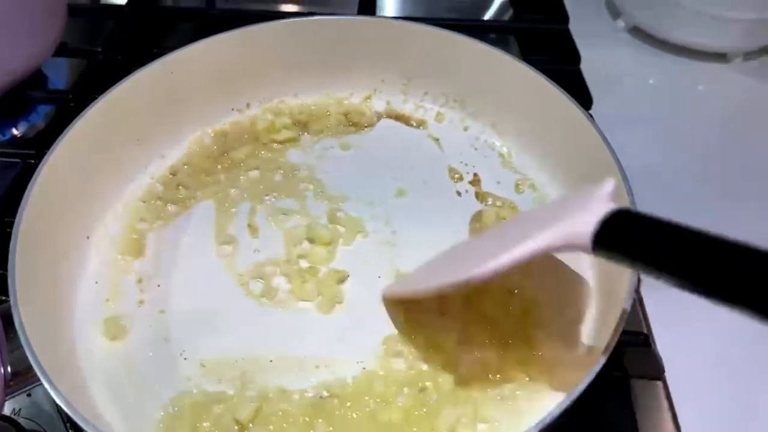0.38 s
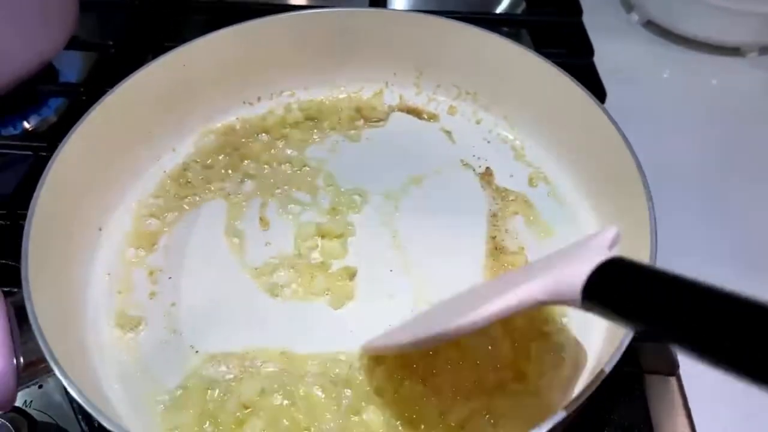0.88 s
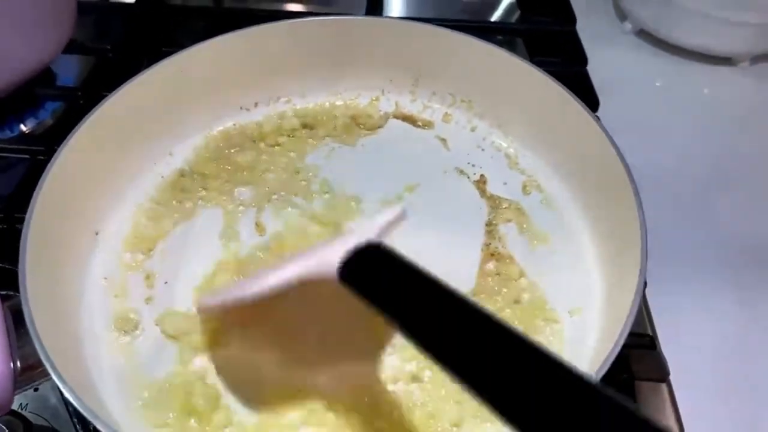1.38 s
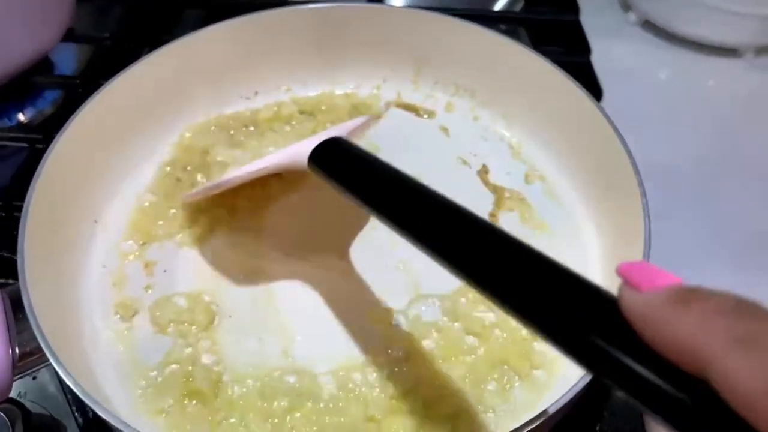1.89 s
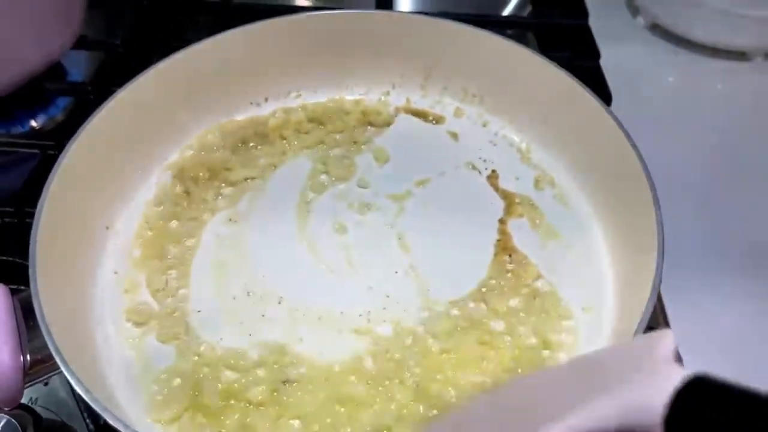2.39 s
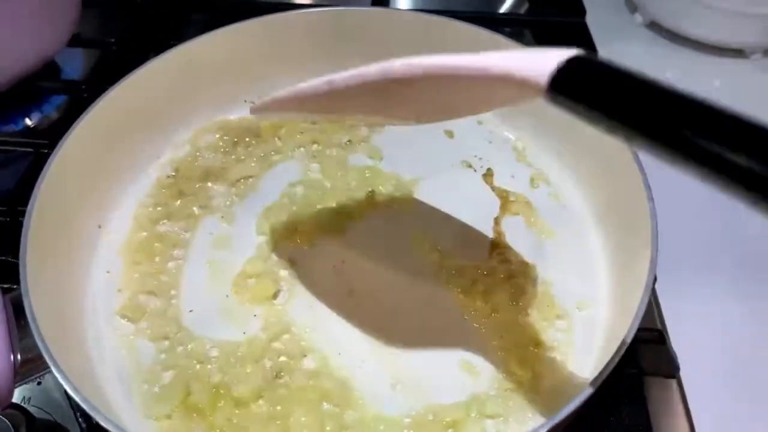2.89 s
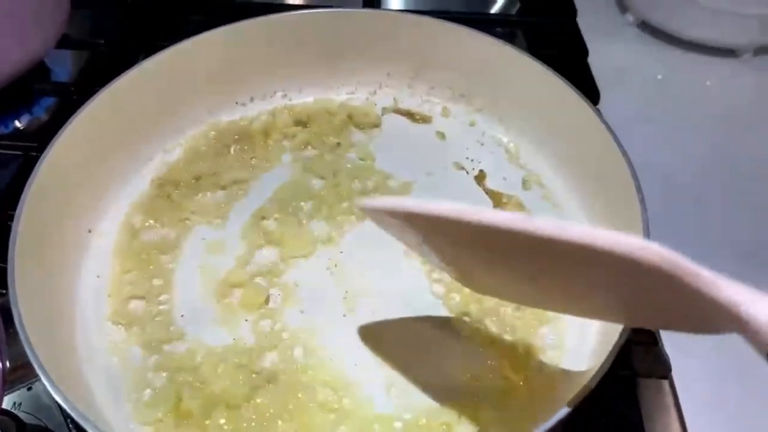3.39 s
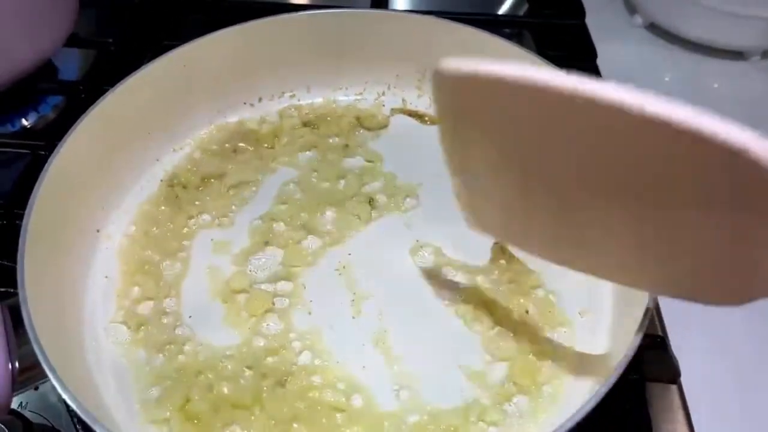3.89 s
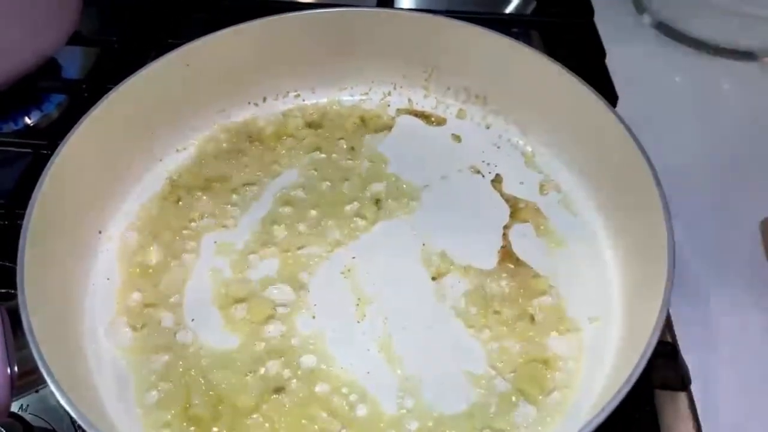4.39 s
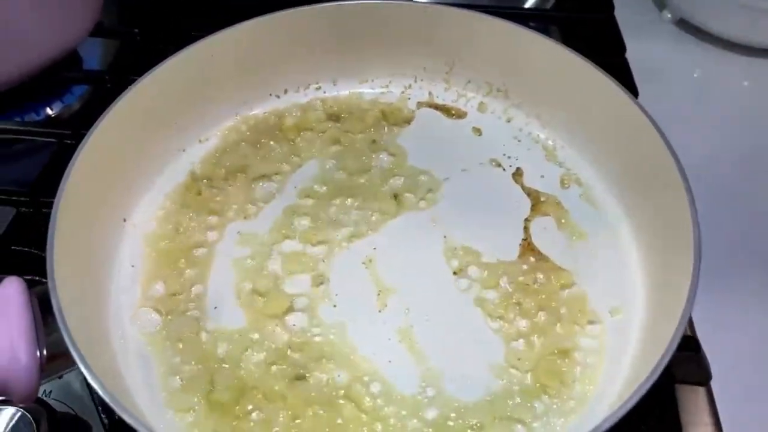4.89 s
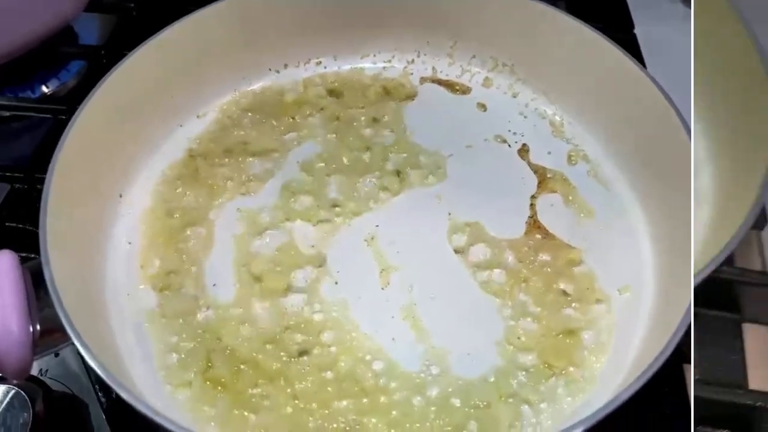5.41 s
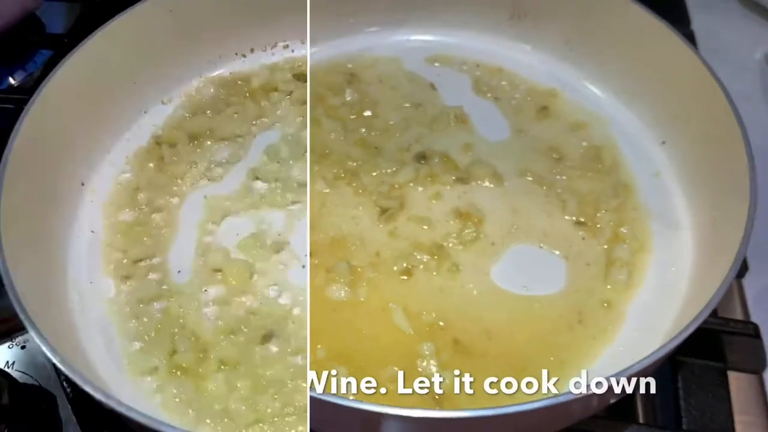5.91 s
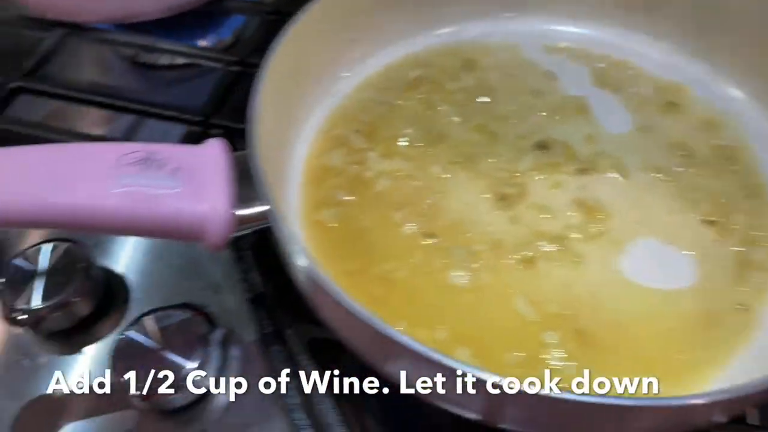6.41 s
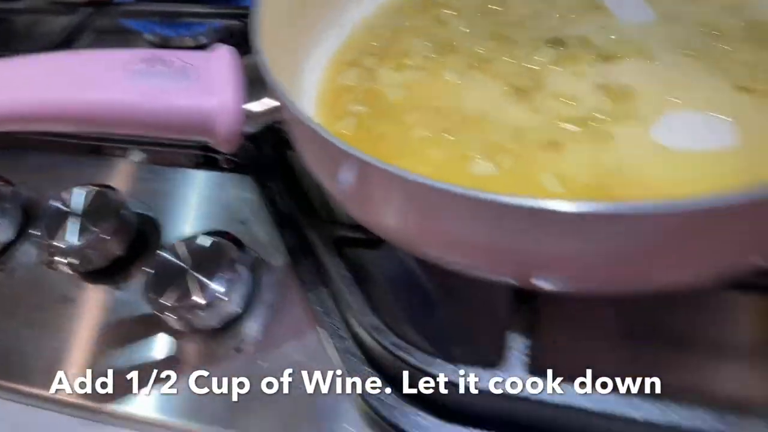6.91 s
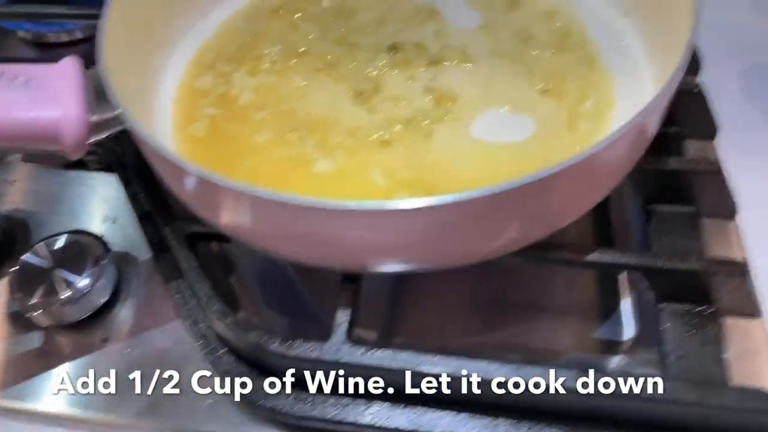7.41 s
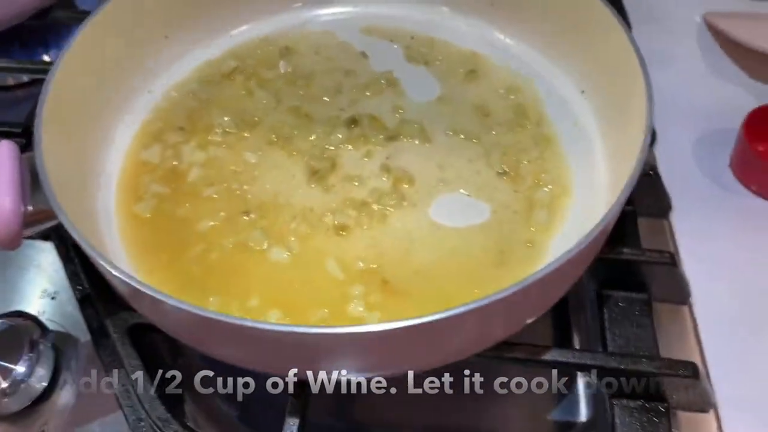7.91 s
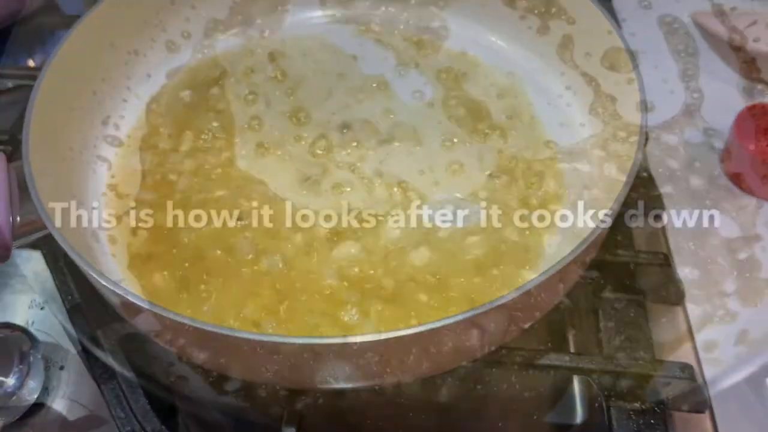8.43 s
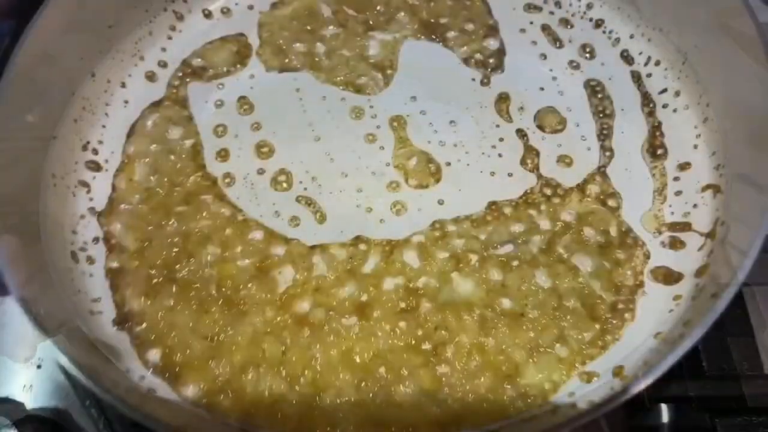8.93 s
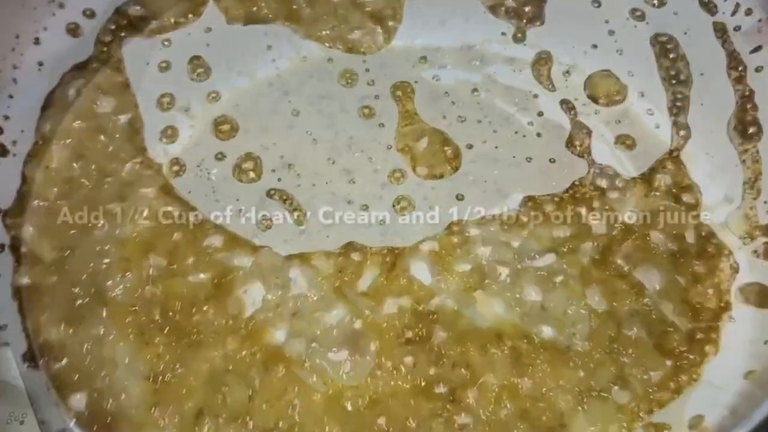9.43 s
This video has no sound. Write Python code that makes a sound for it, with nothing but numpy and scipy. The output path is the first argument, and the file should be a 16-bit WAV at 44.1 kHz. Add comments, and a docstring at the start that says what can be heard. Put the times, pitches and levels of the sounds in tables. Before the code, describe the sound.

Close in a home kitchen, garlic fizzes in butter with sharp fat spits over a low extractor hum. A spatula taps the pan softly, then raps it harder and is laid down with small clinks. Two hard utensil ticks follow, the frying swells briefly, continues steadier and duller, stops for a moment, and returns very faint.

```python
"""Garlic sizzles in butter in an enamel pan under a humming hood fan, in six stretches, with louder frying in
the second, which plays over the end of the first, and in the fourth; the fizz and fan pause briefly before the
last, quiet stretch. Bubbles fizz over hiss and fat spits; a soft spatula bumps the pan and is laid down, and a
hard utensil ticks twice. Fizz and spits are many short dying sines, the fan is shaped noise with wavering
tones, and struck objects are sums of dying sines with a noisy scuff."""
import sys
import numpy as np
from scipy import signal
from scipy.fft import rfft, irfft
from scipy.io import wavfile
from scipy.ndimage import uniform_filter1d

SR = 44100
rng = np.random.default_rng(int(sys.argv[2]) if len(sys.argv) > 2 else 0)


def to_wav(s):
    """Save 16-bit WAV."""
    ch = np.atleast_2d(s).T  # columns
    pcm = np.round(np.clip(ch, -1, 1) * 32767)  # PCM
    wavfile.write(sys.argv[1], SR, pcm.astype(np.int16))


def decibels_to_gain(level_db):
    """Convert a level in decibels to a linear amplitude gain (20 dB per decade)."""
    exponent = np.asarray(level_db, float) / 20
    return 10 ** exponent


N = 421155  # length of the scene [samples]


def evened(x):
    """Scales a sound to an average (rms) strength of 1."""
    return x / np.sqrt(np.mean(x ** 2) + 1e-20)


def add(mix, start_s, sound):
    """Mixes a sound in at a start time."""
    part = mix[round(start_s * SR):][:len(sound)]
    part += sound[:len(part)]


def coloured(x, colour):
    """Flattens the long-term spectrum of x, then gives it the wanted colour at rms 1."""
    spectrum = rfft(x)
    hz = np.fft.rfftfreq(len(x), 1 / SR)
    own = np.sqrt(uniform_filter1d(abs(spectrum) ** 2, size=len(x) // 200) + 1e-20)
    point_hz, point_db = np.transpose(colour)
    wanted_db = np.interp(np.log(hz + 1), np.log(point_hz + 1), point_db)
    return evened(irfft(spectrum / own * decibels_to_gain(wanted_db), len(x)))


def ping(hz, cycles, size=256):
    """A bursting bubble: a sine that dies by 1/e in the given number of cycles."""
    turns = hz * np.arange(size) / SR
    rise = np.minimum(turns * 2, 1)
    return np.sin(2 * np.pi * turns) * np.exp(-turns / cycles) * rise


def pan_echo(x, tail_db=-11, t60=0.027):
    """Early echoes off the pan wall and stove top, then a short diffuse tail from the stove corner."""
    # echoes: (delay [ms], level [dB])
    echoes = [(.9, -12), (2.1, -11), (2.7, -13), (4.4, -17), (12, -23)]
    t = np.arange(SR // 10) / SR
    tail = rng.standard_normal(len(t)) * decibels_to_gain(-60 * t / t60) * np.minimum(t / 0.00058, 1)
    response = decibels_to_gain(tail_db) * tail / np.linalg.norm(tail)
    response[0] = 1  # the direct sound
    for ms, db in echoes:
        response[round(ms * SR / 1000)] += decibels_to_gain(db)
    return signal.oaconvolve(x, response)[:len(x)]


def fan(size, colour, hum_db):
    """Low air rush with blade and motor tones, which waver as slow noise sways their strength and phase."""
    # fan tones: (frequency [Hz], width [Hz], level before hum_db is added [dB])
    tones = [(205.5, 1.1, -8), (244, 4.6, -19)]
    t = np.arange(size) / SR
    out = coloured(rng.standard_normal(size), colour)
    for hz, width, db in tones:
        r = np.exp(-np.pi * width / SR)
        complex_noise = [1, 1j] @ rng.standard_normal((2, size))
        waver = signal.lfilter([1], [1, -r], complex_noise)
        tone = ((4.1 + waver / waver.std()) * np.exp(2j * np.pi * hz * t)).real
        out = out + decibels_to_gain(db + hum_db) * evened(tone)
    return evened(out)


def shudders():
    """The stove top shudders after a bump: slow swells of low shaking reach the phone through its stand."""
    # swells: (centre [s], level [dB], frequency [Hz], half length [s])
    swells = [(1.097, -40, 54.6, .12), (2.362, -38, 53.3, 0.15), (3.22, -40.5, 60, 0.097),
              (3.447, -41.5, 56.7, 0.29), (3.648, -44, 52, 0.28)]
    out = np.zeros(N)
    for s, db, hz, half_s in swells:
        t = np.arange(-half_s, half_s, 1 / SR)
        add(out, s - half_s, decibels_to_gain(db) * np.sin(2 * np.pi * hz * t) * np.hanning(len(t)))
    return out


def struck(modes, blows, scuff_db, drag_db, scuff_t60, rattle_db, rise_s):
    """Each blow is a soft push that rings the modes; longer contact leaves out the highs.
    The scuff changes by drag_db per doubling of contact, up to 1 ms."""
    out, t = np.zeros(N), np.arange(SR // 2) / SR
    hz, db, t60 = np.transpose(modes)[:, :, None]
    chance = rng.standard_normal((len(blows), 2, len(modes), 1))
    noise = rng.standard_normal((len(blows), len(t)))
    for (s, blow_db, ms, spot, free), (vary, turn), scuff in zip(blows, chance, noise):
        softness = 1 + (hz * ms / 1000) ** 2
        reach = decibels_to_gain(db + 0.56 * vary) / softness * (hz / 1500) ** spot
        reach = reach / np.linalg.norm(reach)
        ring = reach * decibels_to_gain(-60 * t / (t60 * free)) * np.sin(2 * np.pi * hz * t + 0.58 * turn)
        band_hz = [modes[0][0] / 2, min(1000 / ms, SR / 4)]
        band = signal.butter(2, band_hz, "bandpass", fs=SR)
        rub_db = scuff_db + drag_db * np.log2(min(ms, 1))
        scuff_fade_db = -60 * t / (scuff_t60 * min(free + .5, 1) ** 2)
        scuff = evened(signal.lfilter(*band, scuff)) * decibels_to_gain(rub_db + scuff_fade_db) / 2
        add(out, s, decibels_to_gain(blow_db) * (ring.sum(0) / 2 + scuff) * np.minimum(t / rise_s, 1))
    # loose parts and room
    scatter = rng.standard_normal(SR // 8) * decibels_to_gain(-60 * t[:SR // 8] / 0.11)
    return out + decibels_to_gain(rattle_db) * signal.oaconvolve(out, scatter / np.linalg.norm(scatter))[:N]


def spatula_laid_down():
    """The spatula is laid down and rocks on its rest, ringing rest and counter."""
    # blows: (time [s], level [dB], contact [ms], landing spot from dull to bright, ring-time factor)
    clinks = [(4.668, -28, 5.3, -1.2, 1.3), (4.747, -28, 5.3, 0.31, 1.1), (5.073, -17, 0.12, 0.28, 0.49),
              (5.083, -24.5, 0.83, 0.42, .7), (5.119, -21.5, 0.43, 0.55, 0.95),
              (5.135, -31.5, 1.2, 0.047, 1.4), (5.165, -32.5, 0.98, -.1, .9), (6.159, -24, 1.1, -.1, 0.22)]
    # ringing of rest and counter: (frequency [Hz], level [dB], 60 dB decay before the factor [s])
    rest = [(108, -14, 0.28), (181, -7, 0.22), (348, -6.5, 0.19), (590, -5, 0.068), (834, -0.5, 0.084),
            (1110, -4, 0.044), (1450, -1, .05), (1785, -6, 0.074), (3258, -7, 0.34), (3300, -10, 0.089),
            (4140, -4.5, 0.086)]
    return struck(rest, clinks, scuff_db=-4.5, drag_db=3, scuff_t60=0.15, rattle_db=-8, rise_s=0.00084)


def utensil_ticks():
    """Two sharp ticks of a small hard utensil with high, short ringing."""
    # blows: (time [s], level [dB], contact [ms], landing spot from dull to bright, ring-time factor)
    ticks = [(5.944, -6, 0.046, 1.6, 0.3), (6.1023, -9.5, 0.14, 0.12, 0.95)]
    # ringing of the utensil: (frequency [Hz], level [dB], 60 dB decay before the factor [s])
    utensil = [(1170, -20, 0.034), (1820, 1, 0.034), (2530, 2, 0.036), (3260, -1, 0.067), (3360, -1, .06),
               (3600, 0.5, .025), (4100, -2, .05), (4480, 7.5, 0.032), (5660, -14.5, 0.024)]
    return struck(utensil, ticks, scuff_db=4.5, drag_db=5.0, scuff_t60=0.045, rattle_db=-1, rise_s=0.0011)


def spatula_on_pan():
    """Spatula on the pan: a sharp edge blow, then soft settling of the blade, rings the pan on its grate."""
    # blows: (time [s], level [dB], contact [ms], ring-time factor)
    raps = [(0.938, -27, 0.26, 0.38), (.950, -27, 1.4, .25), (.962, -27.5, 0.99, 0.38),
            (.99, -31, 3.2, 0.66), (2.212, -36, 1.9, 0.95), (3.163, -16, 0.41, 0.38),
            (3.172, -19, 1.1, 0.45), (3.192, -15, 2.2, .3), (3.266, -15, 1.3, 0.057),
            (3.348, -6.5, 0.38, 0.4), (3.352, -20, 1.6, 0.68), (3.373, -17, 1.14, 0.97),
            (3.511, -23.5, 1.1, 0.88), (3.522, -25, 1.8, 0.42), (3.56, -31, 4.4, .5)]
    # ringing of the pan: (frequency [Hz], level [dB], 60 dB decay before the factor [s])
    pan = [(173, 1, 0.21), (256, -13, 0.55), (321, -13, 0.71), (401, 2, 0.14), (458, -17, 0.23),
           (519, -7, 0.26), (583.5, 7, 0.37), (682, -4, 0.35), (720, -2, 0.39), (810, -12, .15),
           (900, -22, 0.42), (1280, -16, 0.12), (1410, -7, 0.35), (1675, 0, .07), (1720, 5.5, 0.073),
           (1957, -8.5, 0.18), (2290, -3, 0.15), (2680, -15, 0.078)]
    # the shorter the contact, the more the edge lands and the brighter the pan rings
    edge_ms, flat_spot = 0.48, -.35
    blows = [(s, db, ms, flat_spot + edge_ms / ms, free) for s, db, ms, free in raps]
    return struck(pan, blows, scuff_db=-6.5, drag_db=7.5, scuff_t60=0.19, rattle_db=-6.5, rise_s=0.0015)


def spatter():
    """Small spits at random times, as rows like those of the loud spits."""
    # spells of spatter: (from [s], to [s], middle level [dB])
    spells = [(0, 6.3, -29.5), (6.35, 8.7, -35.5)]
    # number of spits in each spell
    counts = (26, 8)
    low_hz, high_hz = 3500, 7500
    rows = []
    for (start, end, db), count in zip(spells, counts):
        when, pitch = rng.random((count, 2)).T
        size, body, spray = rng.standard_normal((count, 3)).T * 5.5  # spread [dB]
        hz = low_hz * (high_hz / low_hz) ** pitch
        rows += zip(start + when * (end - start), db + size, hz, -14.5 + 2 * body, -4.5 + 2 * spray)
    return rows


def spits(count=3):
    """Large bubbles: a ping, a lower body knock and a high snap of fine spray, from several spots in the pan."""
    # loud spits of fat, levels before the fixed gains below: (time [s], level [dB],
    # main ping frequency, high where spray leads [Hz], body level [dB], spray level [dB])
    loud_spits = [(0.1536, -12, 5400, -12, -4), (0.3447, -16.5, 13800, -28, -14),
                  (0.375, -19.5, 5100, -27, -17), (0.424, -13, 4460, -17, -25),
                  (0.4374, -21, 4420, -1.5, -15), (0.4497, -19, 5160, -20, -7),
                  (0.4687, -8, 5630, -21, -18), (0.5, -19, 5020, -25, -20), (0.594, -18.5, 2990, -24, -18),
                  (0.644, -22, 4780, -18, -10), (0.6994, -21.5, 3120, -4.5, -15),
                  (1.2518, -19, 3800, -9, -2), (1.262, -18, 4970, -3, -3), (1.313, -24, 7000, -23, -13),
                  (1.5837, -15, 11100, -12, -11), (1.7165, -17, 5000, -22, -20),
                  (1.7398, -14.5, 3580, -7, -9), (1.8048, -18, 3540, -3.5, -18),
                  (1.983, -25, 4200, -0.5, -1), (2.2104, -13.5, 4020, -9, -14),
                  (2.3438, -21.5, 4140, -18, -12), (2.369, -19, 5870, -7.5, -19),
                  (2.437, -19, 12000, -19, -14), (2.5261, -16.5, 4300, -10.5, -13),
                  (2.6206, -16.5, 4950, -23, -19), (2.8368, -16.5, 4930, -35, -22),
                  (3.2527, -24, 4730, -10, -20), (3.2625, -14, 5060, -30, -14),
                  (3.2658, -7, 12500, -15, -17), (3.2682, -12, 14500, -16, -12),
                  (3.2691, -16, 8800, -16, -10), (3.463, -21.5, 5930, -6, -24),
                  (3.5104, -21.5, 8300, -9, -8), (3.608, -15.5, 6460, -18, -26),
                  (3.6454, -21.5, 8300, -24, -12), (3.9974, -18.5, 5100, -9.5, -22),
                  (4.0146, -21.5, 11600, -14, -16), (4.7393, -13.5, 5900, -21, -26),
                  (5.242, -23, 7280, -23, -20), (5.5987, -23, 5140, -19, -27),
                  (5.8205, -2, 4820, -16.5, -12), (6.25, -16, 4510, -14, -20), (6.3, -23, 4520, -12, -3),
                  (8.5594, -28, 14500, -25, -15), (8.8544, -30.5, 9840, -25, -15),
                  (8.991, -43, 2500, -3, -20)]
    spots = np.zeros((count, N))
    rows = loud_spits + spatter()
    spray_pitches = rng.uniform(9400, 14500, len(rows))  # spray pitch, drawn at random [Hz]
    for k, ((s, db, hz, body_db, spray_db), spray_hz) in enumerate(zip(rows, spray_pitches)):
        main = ping(hz, 0.33 + hz / 9100.0)
        body = decibels_to_gain(body_db) * ping(2340, 0.62)
        spray = decibels_to_gain(spray_db) * ping(spray_hz, 1.37)
        add(spots[k % count], s + .001, decibels_to_gain(db) * (2.3 * main + 3.74 * body + 3.0 * spray))
    return sum(pan_echo(spot, tail_db=-4, t60=.032) for spot in spots)


def fizz(size, colour, per_s, spread_db, hiss, count=24):
    """Bubbles of many sizes burst at random, in loose clusters, over steam hiss."""
    busy = decibels_to_gain(2.3 * evened(uniform_filter1d(rng.standard_normal(size), size=3000)))
    bursts = rng.random(size) < per_s * busy / SR
    strength = bursts * decibels_to_gain(spread_db * np.minimum(rng.exponential(1, size), 4.6))
    kind = rng.integers(0, count, size)
    bubbles = np.zeros(size)
    for k, hz in enumerate(np.geomspace(900, 15000, count)):
        bubbles += signal.oaconvolve(strength * (kind == k), ping(hz, 0.73 + hz / 4500.))[:size]
    bubbles = coloured(pan_echo(bubbles), colour)
    steam = coloured(rng.standard_normal(size), colour)
    return np.sqrt(1 - hiss) * bubbles + np.sqrt(hiss) * steam


def stretch(levels, fizz_colour, fan_colour, bubbling):
    """The steady sounds of one stretch, cut in and out sharply."""
    s, fizz_db = np.transpose(levels)
    *bubbles, fan_db, hum_db = bubbling
    t = np.arange(s[0], s[-1], 1 / SR)
    cut = np.clip(np.minimum(t - s[0], s[-1] - t) / 0.001, 0, 1)
    frying = decibels_to_gain(np.interp(t, s, fizz_db)) * fizz(len(t), fizz_colour, *bubbles)
    hood = decibels_to_gain(fan_db) * fan(len(t), fan_colour, hum_db)
    return s[0], cut * (frying + hood)


def frying_under_fan():
    """Fizz and fan as six stretches, one after another, except that the second plays over the end of the first;
    the frying is louder in the second and fourth."""
    # fizz level, one table a stretch; stirring makes it flare: (time [s], level [dB])
    fizz_levels = [
        [(0.0, -38), (1.14, -39.5), (1.64, -38.5), (1.78, -36), (2.13, -39.5), (2.57, -37), (2.97, -40),
         (3.45, -38), (3.79, -40), (5.9, -41), (6.31, -44.5)],
        [(5.31, -43), (5.4, -41.5), (5.95, -41), (6.05, -35), (6.31, -35.5)],
        [(6.31, -41.5), (7, -43), (8.1, -42.5)],
        [(8.1, -37.5), (8.6, -37.5), (8.71, -40)],
        [(8.71, -42.5), (9.007, -42.5)],
        [(9.188, -54), (9.55, -53)],
    ]
    # fizz colour of each stretch: (frequency [Hz], relative level per Hz [dB])
    fizz_colours = [
        [(710, -55), (1200, -2), (1320, -4), (1490, -1), (1730, -3.5), (1890, -1), (2100, -4.5), (2390, -2),
         (2580, -6.5), (2720, -6.5), (4610, 1.5), (7010, -3.5), (9670, -8.5), (15000, -5), (15700, -8)],
        [(590, -45), (1000, -5), (1230, -2), (1410, -1.5), (1530, 0), (1760, -1), (2430, -4.5), (3430, -8),
         (5250, 0.5), (7010, -8.5), (12300, -17), (14500, -20.5), (15700, -27)],
        [(590, -65), (1000, -6), (1120, -10.5), (1230, -2), (1570, 1), (2430, -6), (3020, -12.5), (3850, -6),
         (4630, -2), (5250, -5.5), (6250, -7), (6850, -14), (7960, -8), (10900, -15.5), (12300, -20),
         (14200, -11.5), (15700, -20)],
        [(590, -46), (1000, -4.5), (1120, -9), (1220, -0.5), (1640, 0.5), (2110, -3), (2240, -3), (2400, -2.5),
         (2660, -6.5), (3240, -6), (4740, 0.5), (5570, 0.5), (9570, -14), (14300, -9), (15700, -9)],
        [(590, -43), (1000, -7.5), (1510, -1.5), (1800, -3), (2460, -6), (2920, -12), (3170, -14), (3430, -14),
         (4030, -5.5), (4630, -4.5), (5630, -9), (6320, -9), (7420, -18), (10100, -17.5), (15700, -17)],
        [(800, -20), (1200, -14), (1520, -9.5), (1700, -2), (1900, -10), (3350, -17), (3680, -5), (3950, -15),
         (4750, -24), (5600, -19.5), (6050, -15), (6500, -17), (9300, -20), (10100, -17), (11000, -24),
         (13200, -23), (14000, -25), (15600, -27)],
    ]
    # one row a stretch: (usual rate [bubbles/s], spread of bubble strength [dB],
    # power share of steam hiss [0-1], fan level [dB], hum gain [dB])
    bubbling = [(2500, 5, 0.8, -47.5, 2.5), (3480, 2.5, 0.4, -47, 7.5), (2620, 3, 0.48, -48, 2.5),
                (3420, 2, 0.68, -44.5, 0.5), (3030, 4, 0.75, -47, 2.5), (2010, 6, 0.92, -49, 0)]
    # air rush of the hood: (frequency [Hz], relative level per Hz [dB])
    hood = [(15, -82.5), (25, -35), (45, -6), (86, 0.5), (104, -0.5), (130, -9), (175, -9.5), (202, -9.5),
            (282, -15), (310, -12), (335, -18.5), (460, -14), (622, -16), (1020, -17.5), (1100, -23.5),
            (1430, -48.5), (2420, -120)]
    # the same hood from over the pan: (frequency [Hz], relative level per Hz [dB])
    hood_over_pan = [(15, -66), (25, -34), (64, -13), (78, 3), (97, -6), (128, -16), (209, -8.5),
                     (245, -22), (303, -10.5), (339, -24.5), (534, -20.5), (827, -26), (1200, -27),
                     (1560, -66), (2640, -120)]
    out = np.zeros(N)
    for settings in zip(fizz_levels, fizz_colours, [hood] * 5 + [hood_over_pan], bubbling):
        add(out, *stretch(*settings))
    return out


def scene():
    """All sources mixed, the same in both channels."""
    mix = shudders() + spatula_laid_down() + utensil_ticks() + spatula_on_pan()
    mix += spits() + frying_under_fan()
    return np.array([mix, mix])


def band_limit(x):
    """A steep low-pass at the top of the band."""
    return signal.sosfilt(signal.butter(12, 16820, fs=SR, output="sos"), x)


def record(dry):
    """A steep low-pass takes away the highest treble."""
    low_pass = signal.firwin(801, 15770, window=("kaiser", 4), fs=SR)  # edge [Hz]
    limited = signal.oaconvolve(dry, low_pass[None], "same")
    return band_limit(limited)


dry = scene()
out = record(dry)
to_wav(out)
```